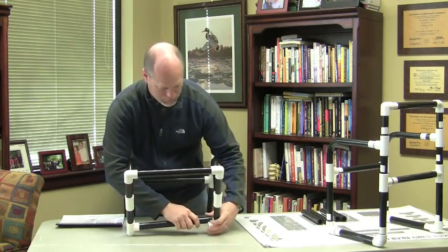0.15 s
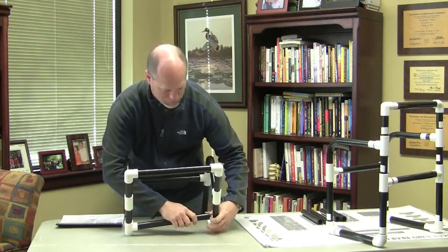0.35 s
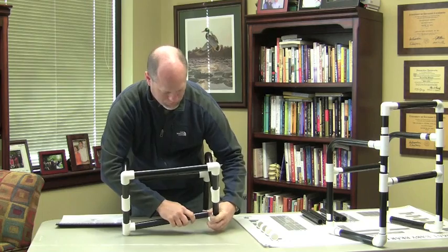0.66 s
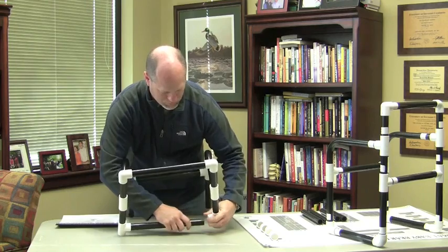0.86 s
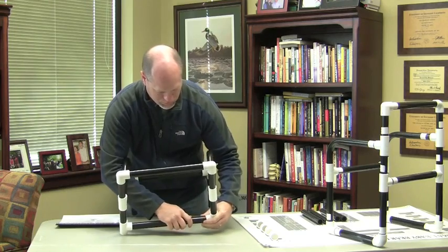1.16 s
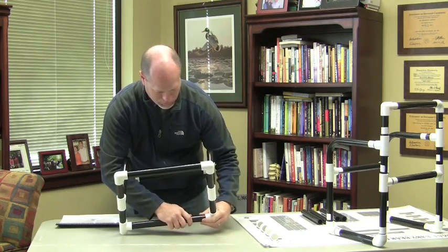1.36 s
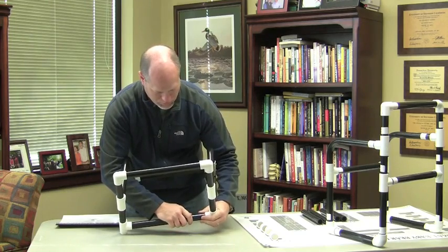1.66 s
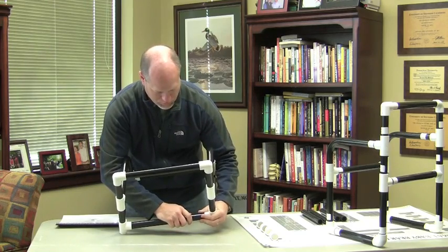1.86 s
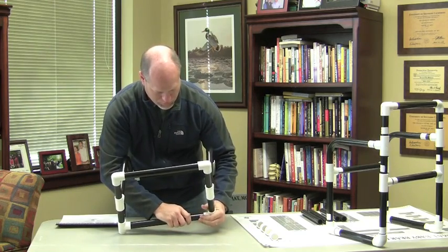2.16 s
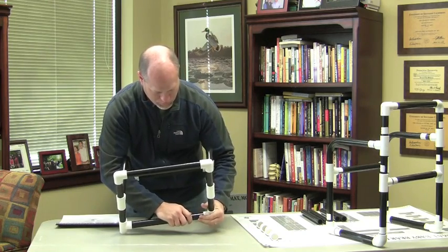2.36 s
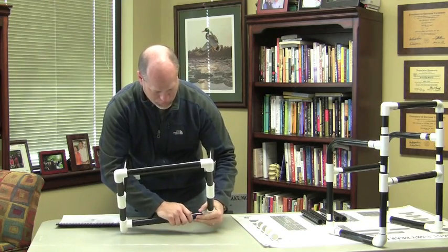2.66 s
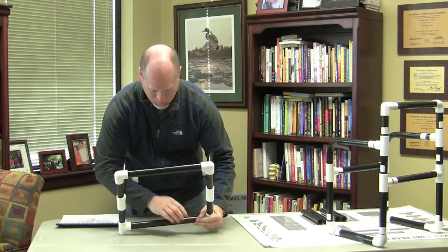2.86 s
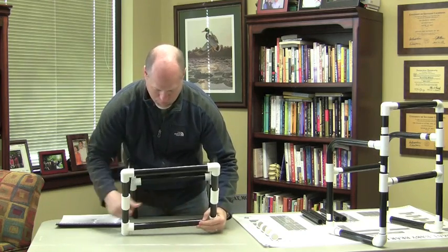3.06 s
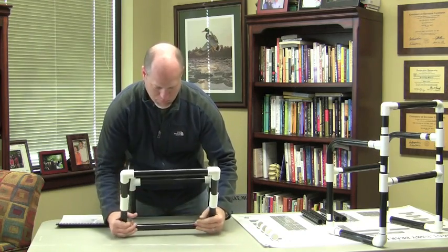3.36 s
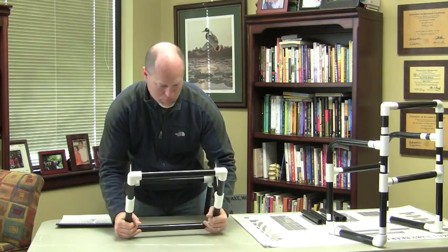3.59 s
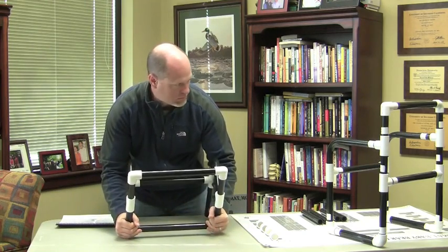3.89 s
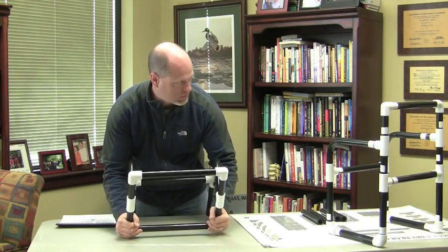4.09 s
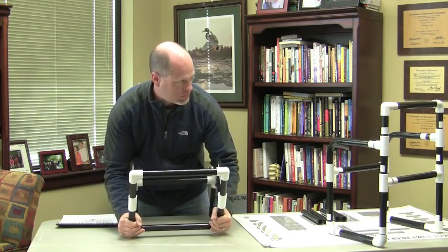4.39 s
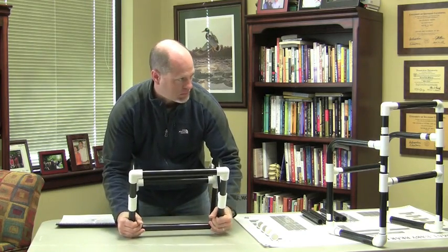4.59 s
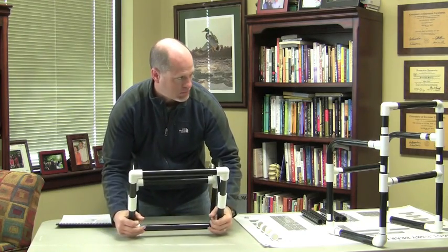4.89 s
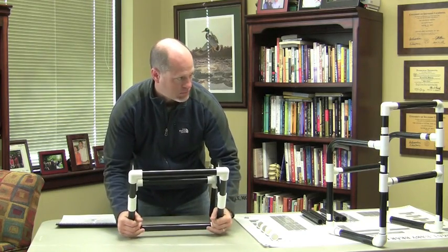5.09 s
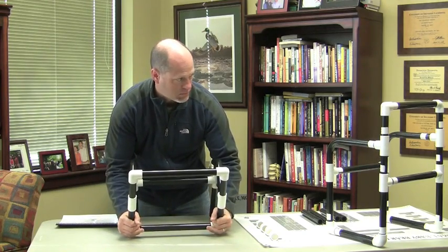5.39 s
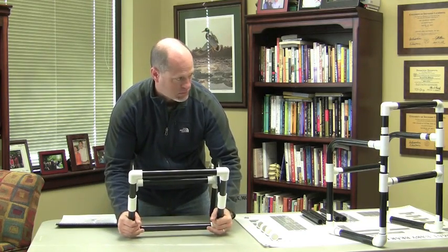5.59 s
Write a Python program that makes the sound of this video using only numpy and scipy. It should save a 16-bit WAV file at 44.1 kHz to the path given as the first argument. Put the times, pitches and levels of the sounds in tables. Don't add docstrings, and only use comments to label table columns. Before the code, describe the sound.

Close to the microphone in a small furnished office, plastic pipes and fittings are pushed together on a light folding table. Sharp dry clicks come in irregular clusters, with hollow thumps of the tabletop, a loud one near one second and more around three. Hands rub softly and the table sways low. Late on, activity thins to faint ticks over ventilation rumble and hum.

```python
import sys
import numpy as np
from scipy import signal
from scipy.io import wavfile
from scipy.ndimage import uniform_filter1d

SR = 44100
rng = np.random.default_rng(int(sys.argv[2]) if len(sys.argv) > 2 else 0)


def volts_from_db(level):
    exponent = np.asarray(level, float) / 20
    return 10 ** exponent


def generate_wav(sig):
    pcm = np.round(np.clip(np.atleast_2d(sig).T, -1, 1) * 32767).astype(np.int16)
    wavfile.write(sys.argv[1], SR, pcm)


N = 253134


def butter(order, hz, kind, x):
    return signal.sosfilt(signal.butter(order, hz, kind, fs=SR, output="sos"), x)


def rms_one(x):
    return x / np.sqrt(np.mean(x ** 2) + 1e-20)


def pressed(times, levels_db, shapes):
    length = shapes.shape[1]
    force = np.zeros(N + length)
    for s, db, shape in zip(times, levels_db, shapes):
        start = round(s * SR)
        force[start:start + length] += volts_from_db(db) * shape
    return force[:N]


def ring(force, hz, t60):
    radius = volts_from_db(-60 / (t60 * SR))
    turn = 2 * np.pi * hz / SR
    return signal.lfilter([0, np.sin(turn)], [1, -2 * radius * np.cos(turn), radius ** 2], force + 1e-18)


def strike(modes, times, levels_db, shapes, spread_db):
    luck_db = spread_db * rng.standard_normal((len(times), 20))
    out = np.zeros(N)
    for k, (hz, db, t60) in enumerate(modes):
        force = pressed(times, levels_db + db + luck_db[:, k], shapes * (-1) ** k)
        out += ring(force, hz, t60)
    return out


# start in seconds, peak level in dB,
# hollow part in dB re the peak, hardness as top band in dB re the peak.
SNAPS = [(0.3063, -25, -18, -12), (0.4427, -15, -4, -5.5), (0.5535, -20.5, -5, -3.5),
         (0.7418, -23.5, 1, -5), (0.7986, -20, -9, -6), (0.8114, -33, -16, 3), (0.823, -15.5, -10, -3),
         (1.1692, -34, 4.5, -6.5), (1.3828, -24, -4, -8), (1.3856, -19.5, -12, -6), (1.5299, -21, -15, -6),
         (1.5698, -20.5, -4, -8), (1.6078, -33, -3, -3), (1.631, -20.5, -20, -11), (1.6464, -24, -1, -7),
         (1.6626, -20.5, -2.5, -4), (2.3431, -16, -5, -4), (2.3496, -12, -2.5, -5.5),
         (2.5387, -19.5, -4.5, -4), (2.5514, -18, -1, -2.5), (3.656, -27.5, -7, -11),
         (3.7476, -21, -6, -10), (3.8053, -28.5, 0, -7.5), (3.8512, -15.5, -8, -8),
         (4.0751, -28.5, -5, -13.5), (4.1803, -20.5, -6.5, -15), (4.1912, -17.5, -20, -9.5),
         (4.2863, -16.5, -4.5, -11.5), (4.3075, -24.5, -9, -2.5), (4.3328, -17.5, -5.5, -0.5)]
# start in seconds, peak level in dB,
# then hollow part, bright part and top in dB re the peak.
KNOCKS = [(0.0605, -35.5, 4, 5.5, -35), (0.0832, -36, -3, 2.5, -26), (0.6949, -25.5, -2.5, -2, -17),
          (0.8344, -24.5, 6, 7.5, -21), (0.9477, -16.5, -11, -3, -19), (0.9616, -33, 12, -2, -3),
          (0.9884, -32, 7.5, -1, -4), (1.0195, -29.5, 4.5, -17, -20), (1.221, -27.5, 8, -1.5, -18),
          (1.235, -37.5, 13, -17, -11), (1.3964, -50, -24, -16, -19), (2.814, -19.5, -26, 0.5, -43),
          (2.8675, -48, 11, -7, -35), (3.0694, -21.5, -21, 0.5, -8), (3.1576, -29.5, -36, -3, -32),
          (3.3603, -11, -1, -15.5, -23.5), (3.401, -21, -16, -43, -54), (3.465, -24, -4, -10, -16),
          (3.8711, -33, 1, -21, -19), (3.9402, -25, -2.5, -7.5, -24), (4.2564, -25, -3, -4, -16),
          (4.4189, -29, -6, -20, -31), (4.651, -33, 3, -6, -24), (5.1173, -34, -2, -10, -29)]
# start
# in seconds, peak level in dB, # hardness as top band in dB re the peak.
TICKS = [(0.0384, -38, -6.5), (0.1979, -35.5, -29), (0.415, -32.5, -14), (1.157, -43, -2),
         (1.1944, -37.5, -7), (1.7993, -42, -9), (1.931, -42.5, -18), (1.9844, -51, -4),
         (2.0444, -45.5, -8), (2.0594, -42, -28), (2.2124, -47, -22), (2.3774, -42, -12),
         (2.5784, -31.5, -22), (3.0638, -15, -20), (3.099, -44, 8), (0.335, -41, -2), (4.1594, -42, -4),
         (4.3447, -29, -35), (4.549, -45, -2), (4.7451, -42.5, -6), (5.0521, -36.5, -20), (5.3078, -47, -9)]


def contacts():
    def bright_db(hard):
        return 4 + 0.68 * hard

    snaps = [(s, db, hollow, bright_db(hard), hard, 6) for s, db, hollow, hard in SNAPS]
    ticks = [(s, db, -11.5, bright_db(hard), hard, -4) for s, db, hard in TICKS]
    knocks = [(*row, 6.5) for row in KNOCKS]
    return np.transpose(snaps + ticks + knocks)


# low edge in Hz, high edge in Hz.
CRACK_BANDS = [(550, 1300), (1300, 2900), (2900, 5600), (5600, 12500)]


def crack(times, levels_db, shapes):
    out = np.zeros(N)
    for k, (band, db) in enumerate(zip(CRACK_BANDS, levels_db)):
        out += (-1) ** k * butter(2, band, "band", pressed(times, db, shapes) + 1e-18)
    return butter(1, 8500, "low", out)


# frequency in Hz, level in dB, t60 in seconds.
PIPE = [(810, -2, .03), (1155, -1, .03), (1560, -3, .025), (2095, 1, .03), (2640, -2, .025),
        (3100, -5, .02)]


def pipes():
    s, body_db, hollow_db, bright_db, top_db, aim_db = contacts()
    size = (len(s), 400)
    ms = np.arange(400) / SR * 1000
    grit = rng.standard_normal(size) * (rng.random(size) < 0.3)
    chatter = 0.3 * grit * np.exp(-ms / 2.5)
    chatter[:, 0] += 0.95
    chatter /= np.sqrt(np.sum(chatter ** 2, axis=1, keepdims=True))
    touch = np.eye(1, 4).repeat(len(s), axis=0)

    levels_db = body_db + np.array([hollow_db + 20, 0 * s + 15.27, bright_db + 14.5, top_db + 15])
    hollow_ring = strike(PIPE, s, body_db - 21, chatter, spread_db=3)
    spread = crack(s, levels_db, touch) + crack(s, levels_db - 15, chatter) + hollow_ring
    aimed = crack(s, levels_db + aim_db, chatter)
    return spread, aimed


# start in seconds, peak level in dB,
# upper modes in dB re the peak, woody edge modes in dB re the peak.
THUMPS = [(0.085, -30.5, 2.5, 13.5), (0.309, -24.5, -4.5, -12), (0.449, -25.5, -27, 0),
          (0.556, -19, -16.5, -10), (0.747, -17, -9, -21), (0.825, -18.5, -14, -7), (0.945, -2, -6, -6.5),
          (0.989, -16, -18, -27), (1.02, -21.5, 1.5, 8), (1.223, -18.5, -4.5, -0.5), (1.261, -35, -23, -8),
          (1.396, -21.5, -25, -9), (1.536, -23, -22, -23), (1.633, -15, -20, -29), (2.348, -6, -9, -14.5),
          (2.414, -24.5, 3, 1.5), (2.812, -6.5, -11, -8), (2.87, -28.5, 7, 7), (3.074, -12, -9, -3.5),
          (3.113, -23, -5, -8), (3.362, -4.5, -7.5, -9), (3.389, -15.5, 6.5, 6.5), (3.467, -19, -9.5, -4),
          (3.662, -21.5, -15.5, -33), (3.888, -29, 1, 4), (3.947, -26.5, 0, 0), (5.111, -27, -8, -0.5),
          (4.301, -17.5, -13, -9), (4.333, -20.5, 1.5, 4.5), (4.658, -36, -5, 1)]
# frequency in Hz, level in dB, t60 in seconds.
TABLE_LOW = [(132, -4.5, 0.12), (165.2, -5.5, 0.1), (168.9, -2, 0.13), (218.7, -1.5, 0.095),
             (221.6, 2.5, 0.12), (259.8, 3.5, 0.041)]
TABLE_UPPER = [(314, 5, 0.051), (312, 4, 0.085), (351.8, 1.5, 0.064), (415.7, -2, 0.053)]
TABLE_EDGE = [(481, -16, 0.24), (483, -18, 0.3), (537.4, -8.5, 0.063), (609, -24, 0.21),
              (669, -13.5, 0.041), (815, -8.5, 0.021), (1000, -7.5, 0.017)]
# time in seconds, pressure in dB.
HANDS = [(0.0, -39.5), (0.15, -34), (0.5, -37), (0.8, -46), (0.96, -33.5), (1.36, -49), (1.63, -31),
         (1.89, -44.5), (2.24, -43), (2.84, -44.5), (3.16, -36.5), (3.4, -47), (3.55, -30.5), (3.93, -39),
         (4.36, -36.5), (4.8, -42), (5.74, -43.5)]


def table():
    nudges = [(s, db - 13, 2, 2) for s, db, *_ in SNAPS]
    s, low_db, upper_db, edge_db = np.transpose(THUMPS + nudges)
    push = np.tile(np.hanning(36) / 18, (len(s), 1))
    blows = strike(TABLE_LOW, s, low_db - 9.5, push, spread_db=2)
    blows += strike(TABLE_UPPER, s, low_db + upper_db - 7.5, push, spread_db=2)
    blows += strike(TABLE_EDGE, s, low_db + edge_db - 7.5, push, spread_db=3)

    rub = rng.standard_normal(N)
    murmur = np.zeros(N)
    for hz, db, t60 in TABLE_LOW + TABLE_UPPER + TABLE_EDGE:
        murmur += volts_from_db(db) * rms_one(ring(rub, hz, 0.23 * t60))
    hands_s, hands_db = np.transpose(HANDS)
    pressure_db = np.interp(np.arange(N) / SR, hands_s, hands_db)
    out = blows + volts_from_db(pressure_db - 11.5) * rms_one(murmur)
    return butter(4, 96, "high", out)


# time of widest sway in seconds, level in dB.
SHOVES = [(0.25, -54), (0.61, -40), (0.99, -30), (1.13, -37), (1.311, -41), (1.55, -43), (1.8, -41),
          (1.93, -48), (2.2, -47), (2.4, -36), (2.86, -30.5), (3.1, -39.5), (3.24, -43), (3.58, -33),
          (3.76, -37), (4.36, -42), (4.68, -41), (5.08, -39.5), (5.3, -46)]


def legs():
    rise_db_per_s, fall_db_per_s, rest_db = 241, 122, -53
    sway = ring(rng.standard_normal(N), hz=69.2, t60=1)
    level = np.sqrt(uniform_filter1d(sway ** 2, size=6000))
    t = np.arange(N) / SR
    swell_db = np.full(N, float(rest_db))
    for s, db in SHOVES:
        slope_db = np.maximum(rise_db_per_s * (s - t), fall_db_per_s * (t - s))
        swell_db = np.maximum(swell_db, db - slope_db)
    return volts_from_db(uniform_filter1d(swell_db, size=1500) - 5) * sway / level


def squeak():
    middle_s, half_s, peak_hz, sag_hz, level_db = 5.52, 0.075, 4080, 750, -70
    off = np.clip((np.arange(N) / SR - middle_s) / half_s, -1, 1)
    hz = peak_hz - sag_hz * off ** 2
    tone = np.sin(2 * np.pi * np.cumsum(hz) / SR)
    return np.sqrt(2) * volts_from_db(level_db) * np.sqrt(1 - off ** 4) * tone


def at_hz(points, hz, axis=1):
    columns = np.array(points)
    return np.interp(np.log(hz), np.log(columns[:, 0]), columns[:, axis])


def octave_noise(size, step):
    edges = 18 * 2 ** np.arange(0, 10.1, step)
    white = rng.standard_normal((2, size))
    for k, (low, high) in enumerate(zip(edges, edges[1:])):
        yield np.sqrt(low * high), butter(2, [low, high], "band", white[k % 2])


# delay in milliseconds, level in dB.
ECHOES = [(1.6, -5.5), (3.3, -1.5), (5.5, -14), (8.8, 0.5), (12.5, -13), (15.2, -8), (21, 0.5)]
# frequency in Hz, t60 in seconds, level in dB.
ROOM = [(98, 0.66, -28.5), (272, 0.36, -16.5), (730, 0.21, -19), (1840, 0.27, -21), (4700, 0.26, -21.5),
        (12800, 0.26, -32)]


def office(x, rise_ms):
    t = np.arange(SR // 2) / SR
    tail = np.zeros(len(t))
    for hz, band in octave_noise(size=len(t), step=0.5002):
        tail += band * volts_from_db(at_hz(ROOM, hz, axis=2) - 60 * t / at_hz(ROOM, hz))
    echoes = np.zeros(len(t))
    for k, (ms, db) in enumerate(ECHOES):
        shifted_ms = ms * (1 + 0.2 * rng.uniform(-1, 1))
        echoes[round(shifted_ms * SR / 1000)] += volts_from_db(db) * (-1) ** k
    echoes = butter(2, 6500, "low", echoes)
    response = echoes + tail * (1 - np.exp(-1000 * t / rise_ms))
    return signal.fftconvolve(x, response)[:N]


def moving(x):
    places = 6
    starts = np.sort(contacts()[0])
    order = np.arange(len(starts) + 1) * 5 % places
    spot = order[np.searchsorted(starts * SR - 160, np.arange(N))]
    out = np.zeros(N)
    for k in range(places):
        here = uniform_filter1d(1.0 * (spot == k), size=300)
        out += office(x * here, rise_ms=0.21)
    return out


# frequency in Hz, density in dB per Hz.
AIR = [(20, -38), (42, -63), (66, -53), (95, -46), (160, 6), (200, 7.5), (260, -2.5), (330, -3),
       (500, -18.5), (800, -18), (1400, -28), (3000, -30.5), (7000, -39.5), (16000, -43.5)]
# frequency in Hz, level in dB rms.
HUM = [(28, -65), (120, -49), (240, -49)]


def background():
    settle = SR // 4
    air = np.zeros(N)
    for hz, band in octave_noise(size=N + settle, step=1 / 3):
        air += volts_from_db(at_hz(AIR, hz)) * band[settle:]
    t = np.arange(N) / SR
    hum = sum(np.sqrt(2) * volts_from_db(db) * np.sin(2 * np.pi * hz * t) for hz, db in HUM)
    return volts_from_db(-38.5) * rms_one(air) + hum


def scene():
    spread, aimed = pipes()
    aimed = butter(1, 7000, "low", aimed)
    top = table()
    direct = aimed + volts_from_db(5.5) * top
    in_room = moving(spread + volts_from_db(-2) * top)
    return (direct + in_room + legs() + squeak() + background())[None]


def top_cut(x):
    return signal.sosfilt(signal.butter(12, 15780, fs=SR, output="sos"), x)


def record(dry):
    mix = 0.98 * np.tanh(dry / 0.93)
    return top_cut(mix)


dry = scene()
out = record(dry)
generate_wav(out)
```